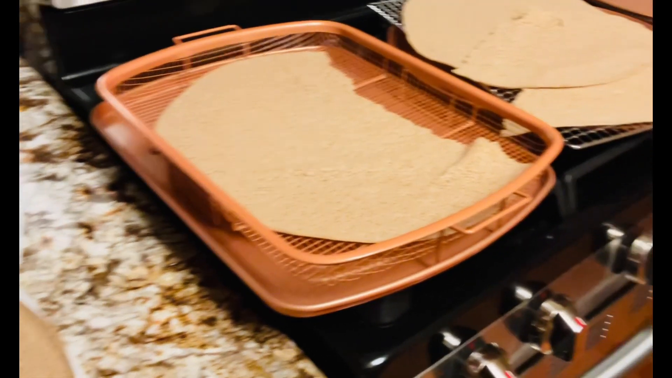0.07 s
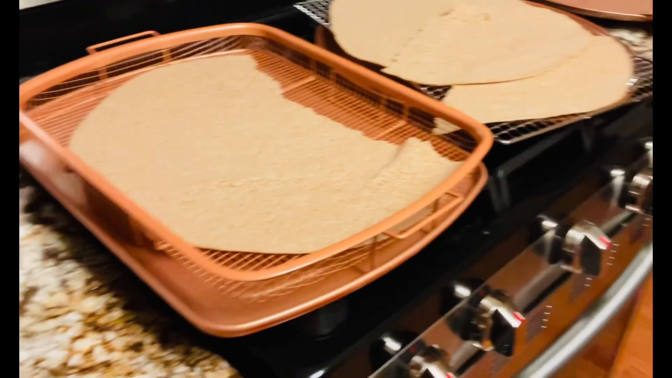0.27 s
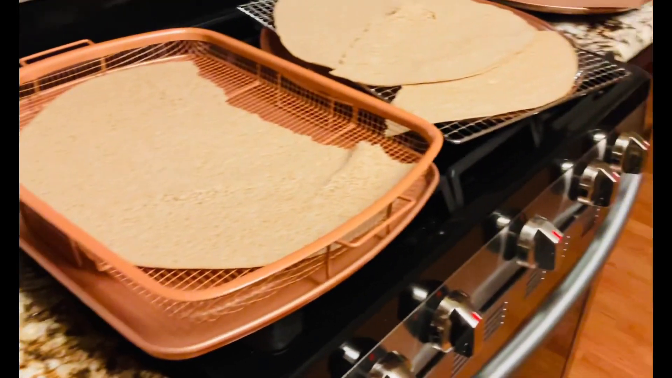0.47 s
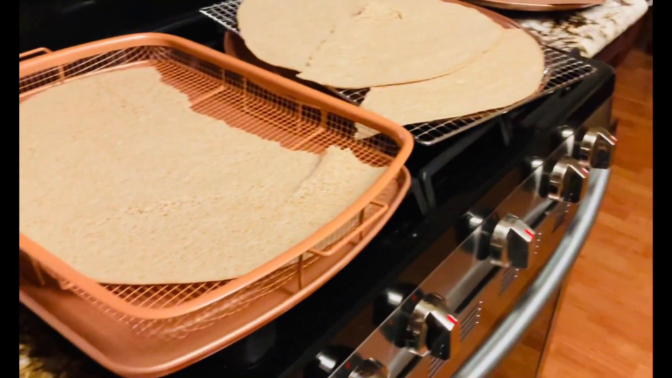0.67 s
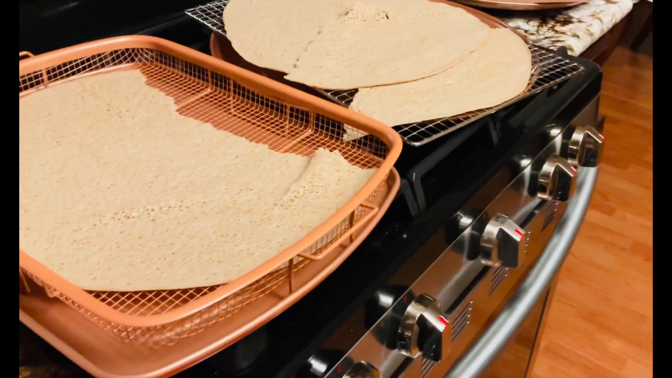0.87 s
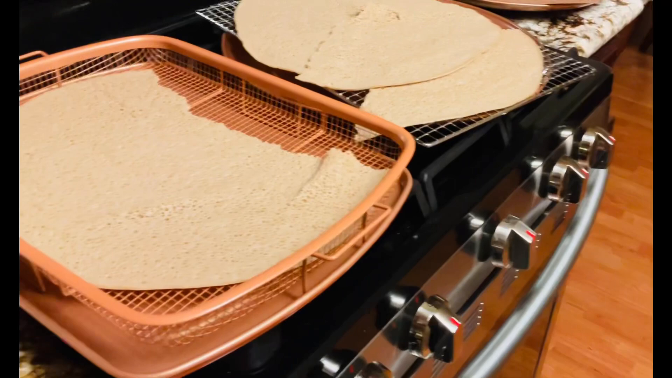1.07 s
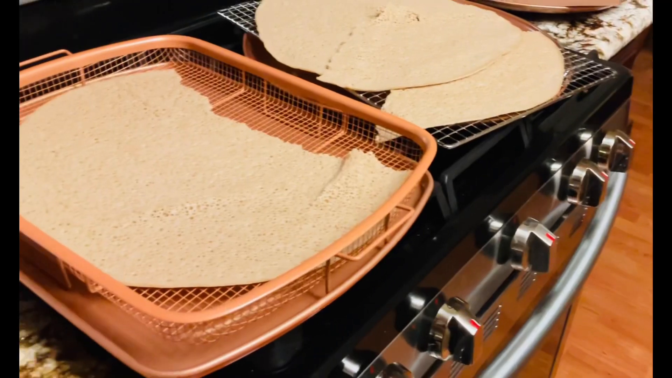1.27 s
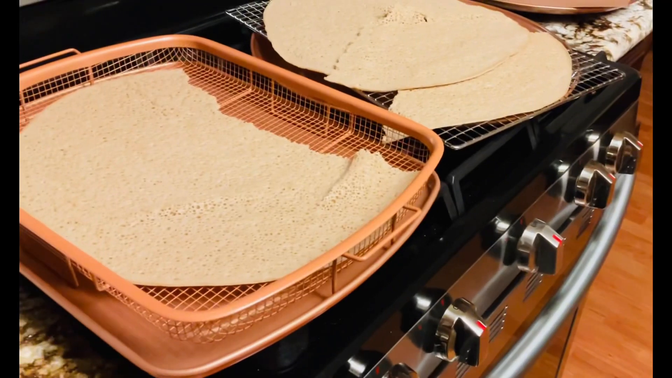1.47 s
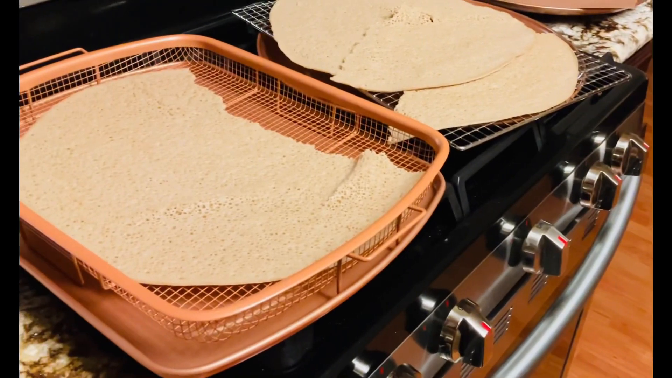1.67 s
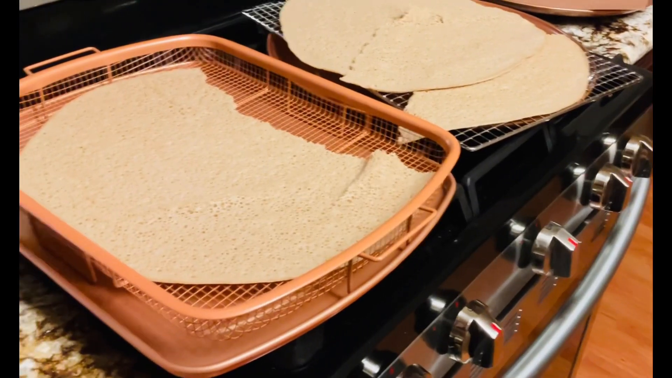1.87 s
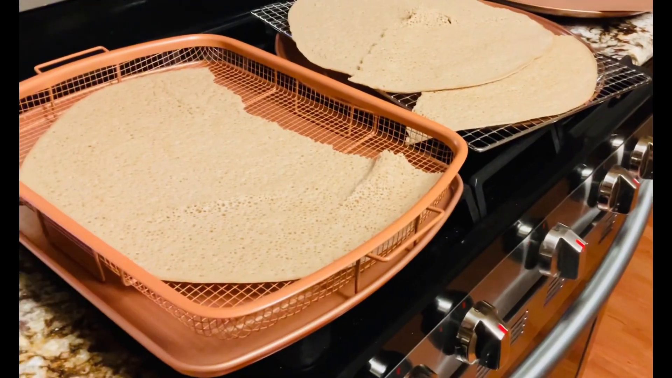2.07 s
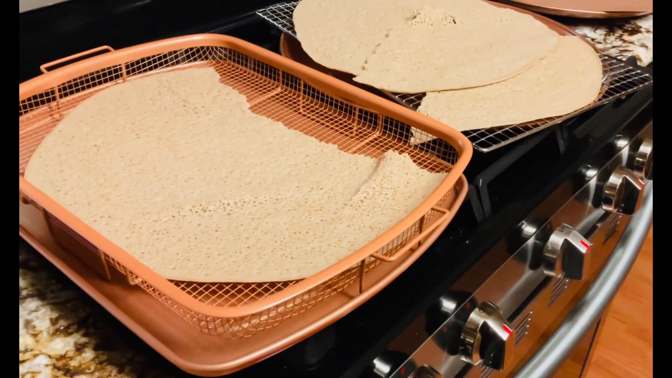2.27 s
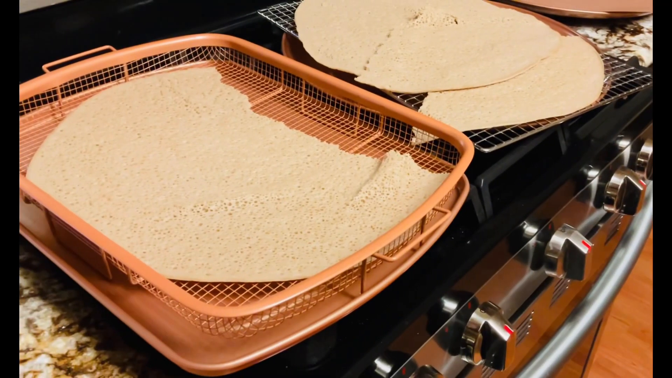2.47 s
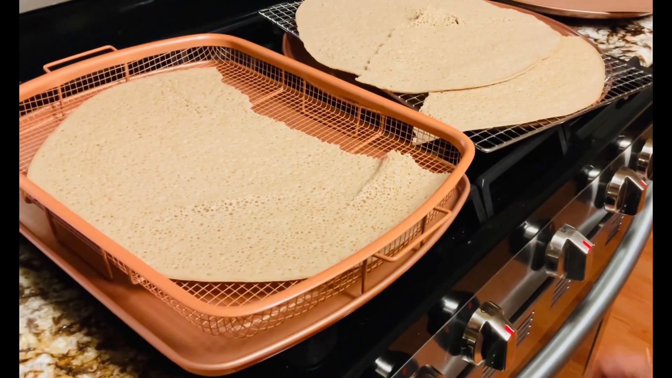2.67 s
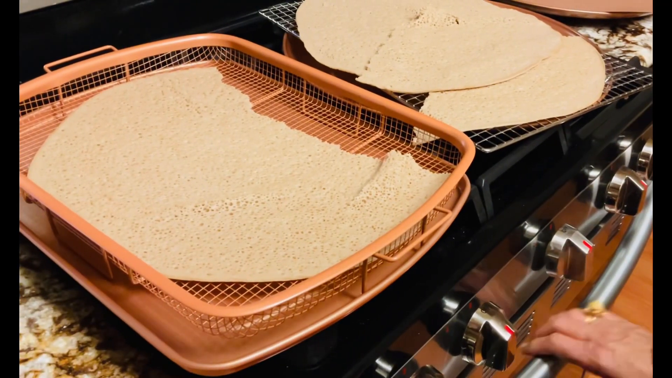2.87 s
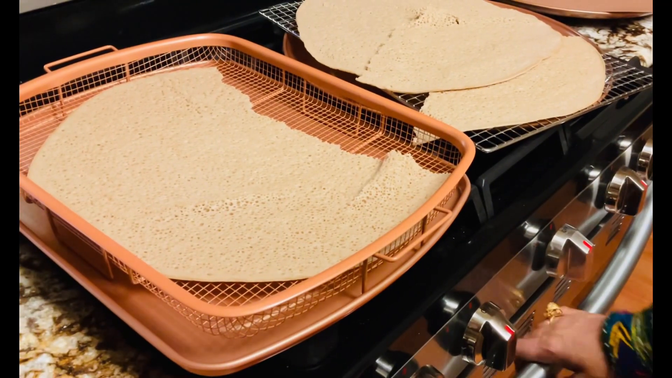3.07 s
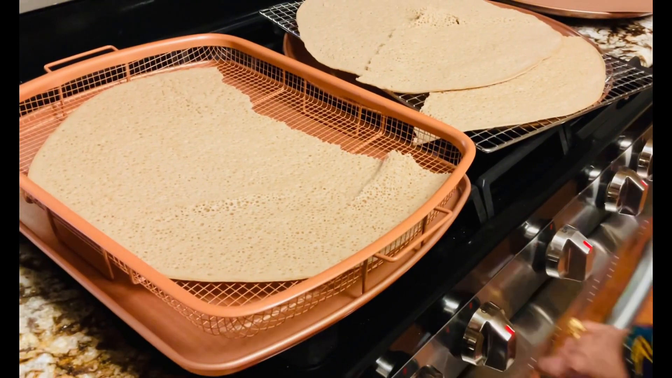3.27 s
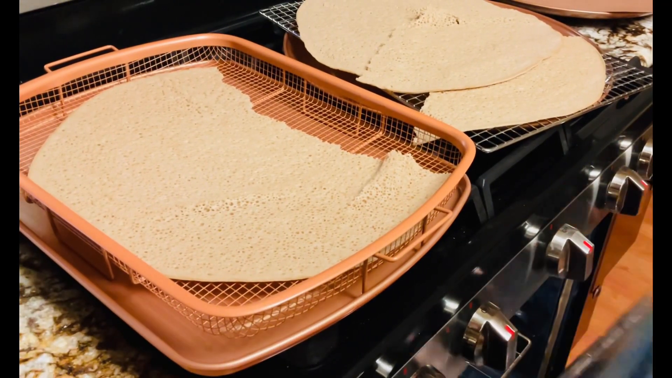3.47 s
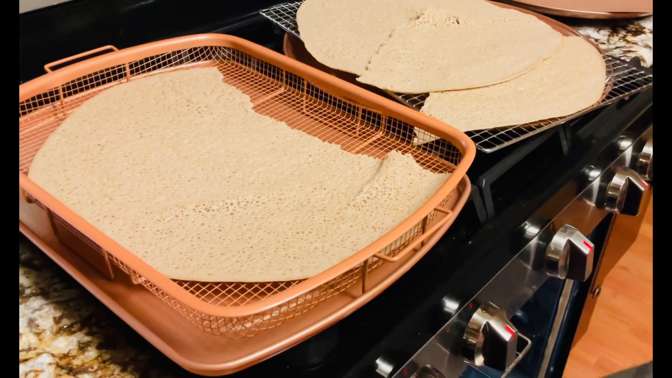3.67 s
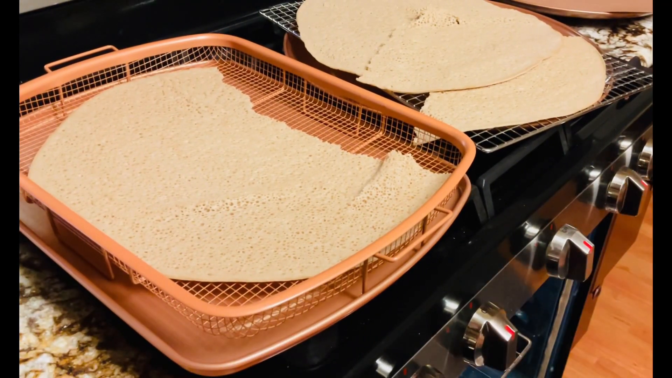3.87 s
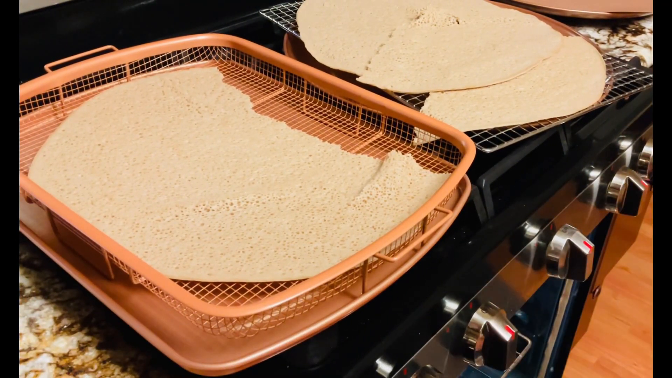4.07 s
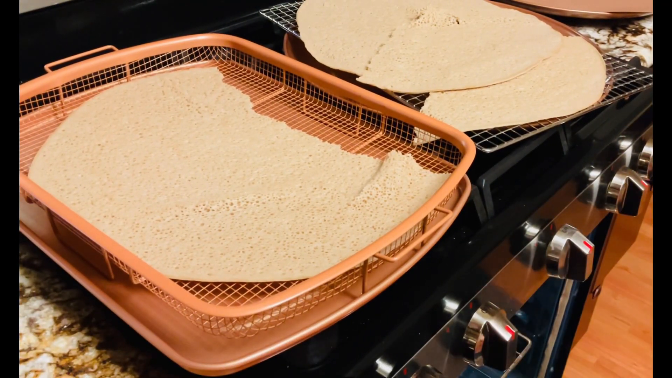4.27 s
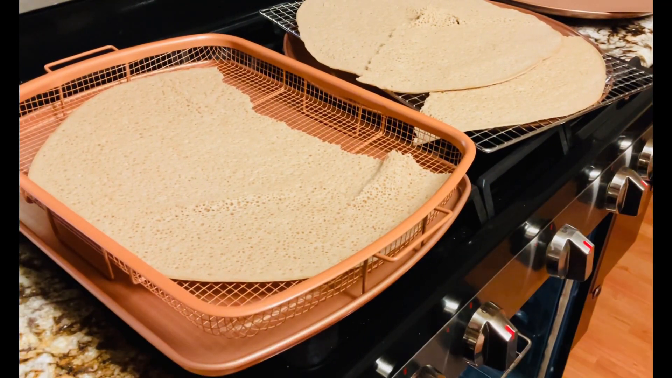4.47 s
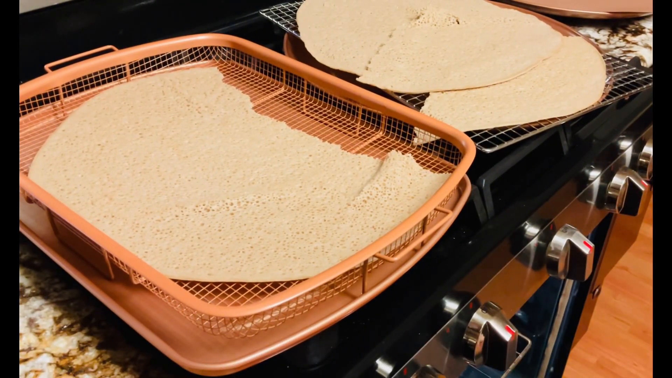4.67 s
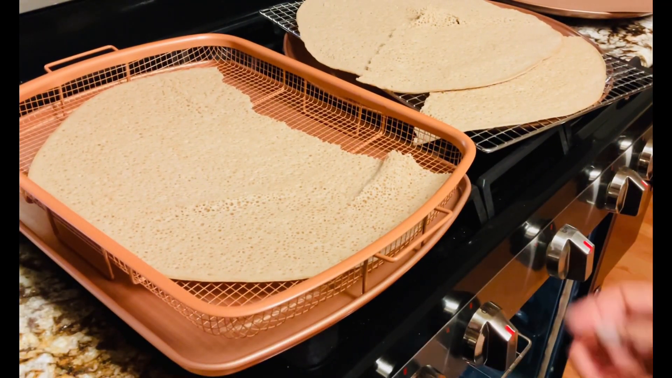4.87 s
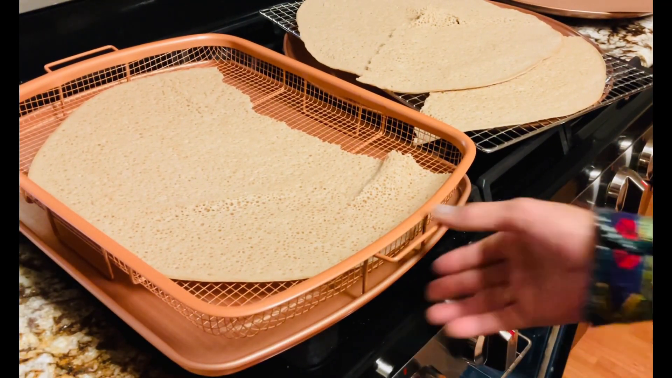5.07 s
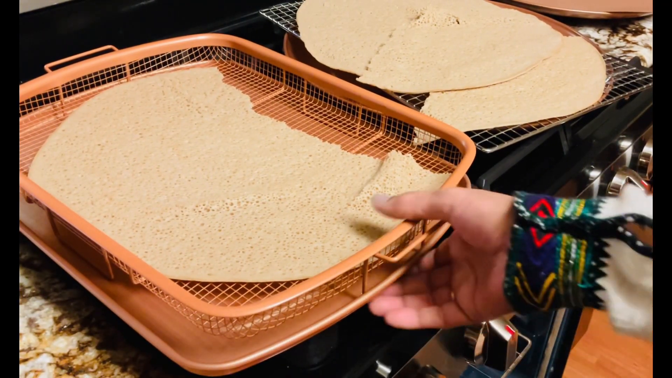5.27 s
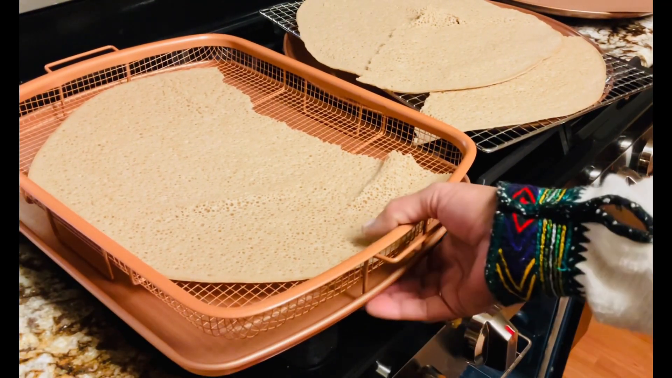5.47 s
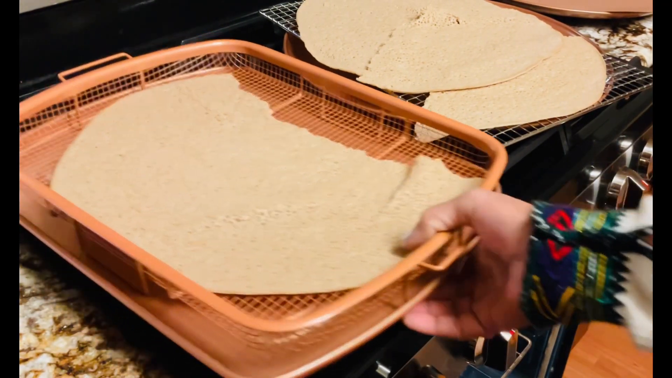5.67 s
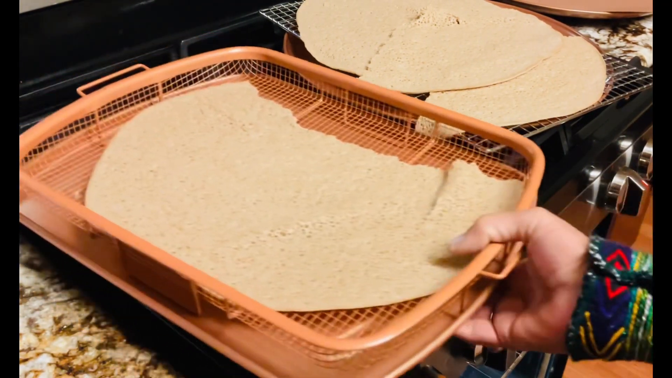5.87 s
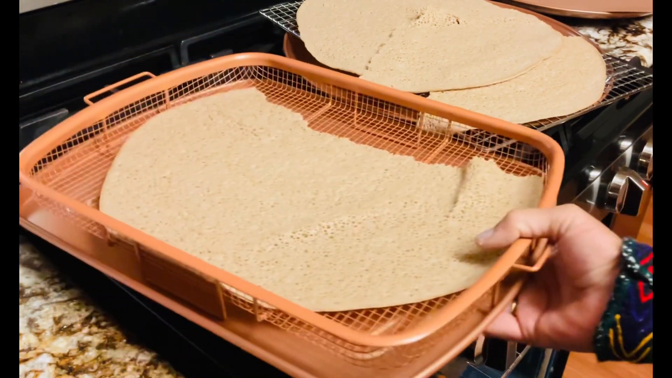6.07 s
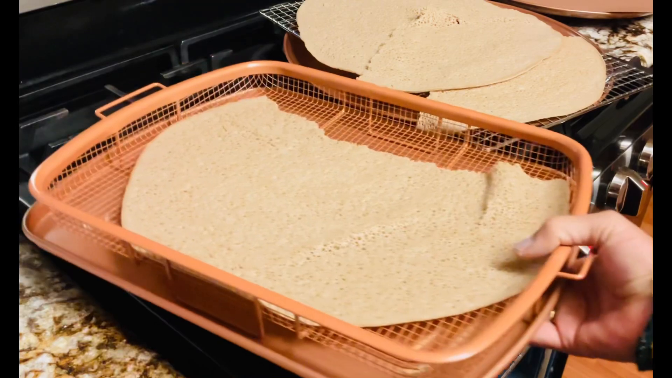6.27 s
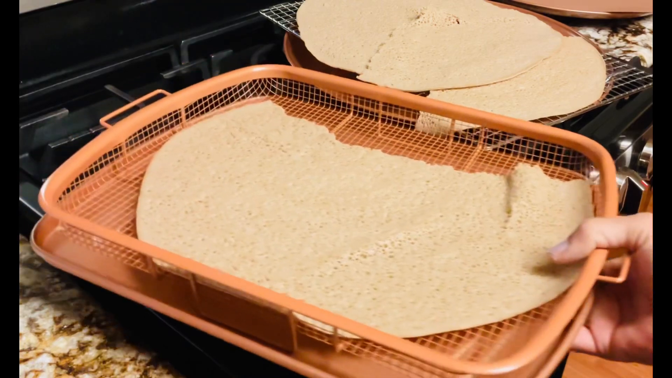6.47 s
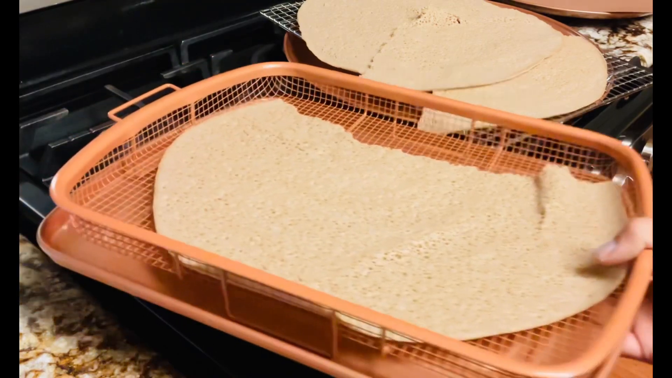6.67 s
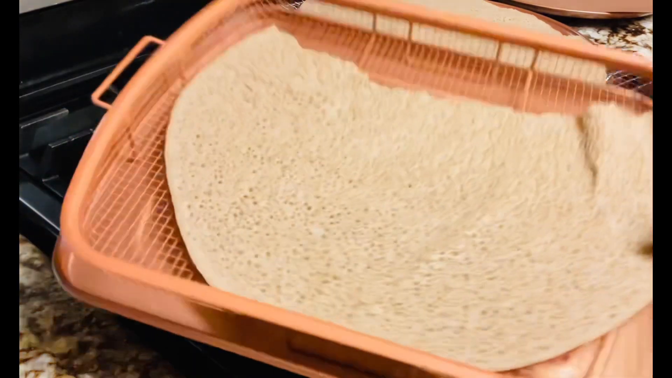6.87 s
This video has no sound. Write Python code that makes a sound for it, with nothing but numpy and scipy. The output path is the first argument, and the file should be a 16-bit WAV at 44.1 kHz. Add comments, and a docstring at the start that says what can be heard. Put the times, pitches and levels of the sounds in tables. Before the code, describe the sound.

A quiet kitchen heard by a close phone microphone, with short reflections from hard walls. From the start, a steady low oven fan hum sits over soft room air and faint fridge drones. At 0.3-0.85 s a mount creaks, its dry ticks slowing to single clicks over a small groan. From 1 to 3 s, cloth swishes softly, with faint steps and tiny hollow blips near 1.6 and 1.95 s. At 3.05-3.5 s the oven door is pulled: crisp clicks, sharp clacks and a woody thump, as the hum stops abruptly. Duller thuds follow at 4.0-4.4 s, then sleeve swishes around 4.7 s and small knocks near 5 s. At 5.4 s a wire basket on a metal tray starts scraping over the stove, chattering and rattling, with thin squeaks around 6.0-6.2 s. It briefly eases, then bumps hard at 6.53 s, bright and clanging, ringing away by 6.9 s.

```python
"""A quiet kitchen: over soft room air an oven fan hums on twice the mains and cloth brushes faintly.
A mount creaks ever slower, as stick-slip ticks; then sleeves and slippers swish as filtered noise.
Steps and the door knock as short notes with noisy cracks, beside a few hollow gliding blips.
The hum stops as the oven door is pulled. Last, a wire basket on a sheet-metal tray is dragged over
the stove, its chatter ringing banks of resonances, and it bumps hard at the end."""
import sys
import numpy as np
from scipy import signal
from scipy.fft import rfft, irfft
from scipy.io import wavfile
from scipy.ndimage import uniform_filter1d

SR = 44100
rng = np.random.default_rng(int(sys.argv[2]) if len(sys.argv) > 2 else 0)


def output_pcm(signal):
    """Save a mono or channel-first signal as 16-bit PCM at the path in sys.argv[1].

    Samples are clipped to [-1, 1] before scaling.
    """
    pcm = np.clip(np.atleast_2d(signal).T, -1, 1) * 32767
    wavfile.write(sys.argv[1], SR, np.round(pcm).astype(np.int16))


def boost(x):
    """Linear amplitude factor 10**(x/20) for a level x in decibels (scalar or array-like)."""
    u = np.asarray(x, float) / 20
    return 10 ** u


N = 305172
T = np.arange(N) / SR

# spectrum of the finest fibres and grit: pitch_hz, density_db (per Hz)
FINE_TONE = [(7000, -32), (10000, 6), (13000, 8.5), (16000, 0.5)]


def unit(x):
    """Scale to rms 1."""
    return x / np.sqrt(np.mean(x ** 2))


def shape(x, points, tilt_db=0.):
    """Filter x by (Hz, dB) points and a tilt in dB per octave about 3 kHz."""
    hz, db = np.transpose(points)
    f = np.maximum(np.fft.rfftfreq(len(x), 1 / SR), 1)
    gain_db = np.interp(np.log(f), np.log(hz), db) + tilt_db * np.log2(f / 3000)
    return irfft(rfft(x) * boost(gain_db), len(x))


def colour(x, points, tilt_db=0.):
    """Shaped x at rms 1."""
    return unit(shape(x, points, tilt_db))


def curve(rows):
    """Columns of a table drawn against time, at -120 outside it."""
    s, *columns = np.transpose(rows)
    return [np.interp(T, s, c, left=-120, right=-120) for c in columns]


def walk(rate):
    """Random levels drawn rate times a second and joined by straight slews; spread near 1."""
    k = int(SR / rate)
    held = np.repeat(rng.standard_normal(N // k + 1), k)
    return uniform_filter1d(held, k)[:N]


def ring(x, hz, t60):
    """One resonance: a unit impulse rings at unit size and falls 60 dB in t60 seconds."""
    r = np.exp(-np.log(1000) / (t60 * SR))
    w = 2 * np.pi * hz / SR
    return signal.lfilter([0, r * np.sin(w)], [1, -2 * r * np.cos(w), r * r], x)


def grains(rate, spread):
    """Random clicks of very unequal size, rate per second."""
    hits = rng.random(N) < rate / SR
    return hits * rng.standard_normal(N) * boost(spread * rng.exponential(size=N))


def fade(t60, rise, size):
    """Envelope of a blow: quick rise, exponential fall."""
    t = np.arange(size) / SR
    return (1 - np.exp(-t / rise)) * np.exp(-np.log(1000) * t / t60)


def add(out, s, x):
    """Mix x in from time s."""
    i = int(s * SR)
    out[i:i + len(x)] += x[:N - i]


def appliances():
    """Fan hum as a sine with overtones, fridge drones as ringing noise, and air as soft broad noise."""
    # oven fan: start_s, level_db
    hum_level = [(0.0, -47), (0.46, -47.5), (0.64, -47.5), (3.07, -48), (3.22, -54), (3.29, -54)]
    # hum overtones: multiple, level_db (against the fundamental)
    overtones = [(2, -25), (3, -25.5)]
    # steady fridge drones: pitch_hz, width_hz (rough), level_db
    drones = [(208.8, 4.7, -71), (55, 24, -69.5), (4400, 41, -83.5), (3840, 210, -80.5), (987, 30, -81.5)]
    # spectrum of the air: pitch_hz, density_db (per Hz)
    air_tone = [(30, -7.5), (50, -9), (100, 0), (160, -5), (300, -10.5), (600, -9.5), (800, -22.5),
                (1100, -15.5), (1600, -22.5), (2500, -27.5), (4500, -36.5), (6000, -43), (16000, -38.5)]
    # loudness of the air: start_s, level_db
    air_level = [(0, -60.5), (1.5, -61), (3.2, -59.5), (3.9, -61), (4.5, -66.5), (5.3, -71), (6.92, -70)]
    hum_hz, hum_waver_db, air_waver_db = 120.2, 1, 1.2

    phase = 2 * np.pi * hum_hz * T
    tone = np.sin(phase) + sum(boost(db) * np.sin(k * phase) for k, db in overtones)
    out = np.sqrt(2) * tone * boost(curve(hum_level)[0] + hum_waver_db * walk(3.6))
    for hz, width, db in drones:
        out += boost(db) * unit(ring(rng.standard_normal(N), hz, 1.8 / width))
    air = colour(rng.standard_normal(N), air_tone)
    return out + boost(curve(air_level)[0] + air_waver_db * walk(6.8)) * air


def blips():
    """Short hollow notes with rounded swells whose pitch glides, each with one echo."""
    # start_s, pitch_hz (at the start), level_db, length_s,
    # glide_per_s (half the rise per second, as a share of the pitch), second_db (2nd harmonic, relative)
    notes = [(1.62, 320, -53.5, 0.027, 2, -20), (1.638, 610, -52, .02, 10, -16),
             (1.929, 307, -53, .03, 2, -20), (1.98, 580, -46, .024, 6, -12),
             (3.983, 331, -43.5, 0.064, -3, -37), (4.263, 314, -53, 0.1, 0, -20)]
    echo_s, echo_db = 0.021, -10

    out = np.zeros(N)
    for s, hz, db, length, glide, second_db in notes:
        t = np.arange(int(length * SR)) / SR
        phase = 2 * np.pi * hz * (t + glide * t ** 2)
        tone = np.sin(phase) + boost(second_db) * np.sin(2 * phase)
        note = boost(db) * tone * np.sin(np.pi * t / length)
        add(out, s, note)
        add(out, s + echo_s, boost(echo_db) * note)
    return out


def creak():
    """Stick-slip in the mount: ever slower ticks over a low groan, then lone ticks."""
    # run of slips: start_s, slips_per_s (before jitter), level_db
    slip_run = [(.26, 260, -80), (.3, 233, -60.5), (.42, 212, -57), (.52, 114, -54), (.6, 67, -51.5),
                (.61, 60, -85)]
    # last single slips: start_s, level_db
    lone_slips = [(0.6556, -55.5), (0.691, -50.5), (0.7872, -54.5), (0.817, -51.5), (0.8344, -53.5),
                  (0.8494, -57)]
    # spectrum of a tick: pitch_hz, density_db (per Hz)
    tick_tone = [(900, -5.5), (1800, -4.5), (3300, -7), (4600, -1.5), (5700, -5), (7500, -15),
                 (9000, -19.5), (16000, -24)]
    groan_hz, groan_db = 328, -5.5  # level against the slips

    rate, db = curve(slip_run)
    turns = np.cumsum(np.maximum(rate, 0) * (1 + .15 * walk(90))) / SR
    # one slip each time the count passes a whole number
    slips = np.diff(np.floor(turns), prepend=0) * boost(db + 0.9 * walk(120))
    for s, slip_db in lone_slips:
        slips[int(s * SR)] += boost(slip_db)
    puffs = signal.fftconvolve(slips, fade(0.019, 0.00015, size=2048))[:N]
    ticks = puffs * colour(rng.standard_normal(N), tick_tone)
    # the groan sinks away as the slips slow down
    groan_level = boost(db + groan_db) * np.clip(rate / 200, 0, 1) ** 2
    groan = groan_level * unit(ring(rng.standard_normal(N), groan_hz, 0.039))
    return ticks + groan


def swish():
    """Fibres of sleeves and slippers rubbing: a soft hiss, and a separate whisper at the very top."""
    # one list per run of strokes: start_s, level_db, top_db (whisper against the hiss)
    strokes = [
        [(0.0, -65.5, -7), (0.02, -80, -5), (0.066, -75, -14), (0.074, -79.5, -1), (0.246, -77, -14),
         (0.282, -67.5, -23), (0.3, -67, -18)],
        [(1.0, -67, -18), (1.022, -74, -10), (1.054, -66.5, -20), (1.072, -67, -27), (1.102, -62, -16),
         (1.232, -53.5, -14), (1.37, -86, -20), (1.382, -86, -7), (1.4, -76, -25)],
        [(1.42, -92, -4), (1.432, -70, -21), (1.596, -92, -11), (1.606, -69, -1), (1.636, -75, -9),
         (1.644, -64, -15), (1.712, -77, -17), (1.75, -76, -21)],
        [(1.93, -89, -15), (1.952, -70.5, -28), (2.042, -74.5, -11), (2.064, -89, -15), (2.07, -93, -18),
         (2.1, -94, -15)],
        [(2.13, -79, -12), (2.186, -81, 10), (2.198, -73, -2), (2.314, -72, -8), (2.334, -62.5, -17),
         (2.422, -54, -15), (2.51, -72.5, -11), (2.672, -89, 5), (2.706, -70, -18), (2.738, -70, -5),
         (2.746, -58.5, -8.5), (2.866, -59, -5), (2.956, -71.5, -3), (3.052, -52.5, -15), (3.062, -51, -4),
         (3.12, -69, -15)],
        [(3.4, -48, -12), (3.422, -62, -10), (3.448, -61, -17), (3.454, -48.5, -22), (3.514, -72.5, 2),
         (3.62, -65, 3), (3.718, -73, -2), (3.742, -80, 5), (3.788, -86, -20), (3.9, -97, -3)],
        [(3.95, -92, -11), (3.974, -94, -5), (3.986, -57, -15), (4.072, -101, -13), (4.146, -83, -11),
         (4.228, -96, -5), (4.26, -82, -23), (4.338, -76, -14), (4.388, -84, 8), (4.394, -70, -9),
         (4.5, -91, -3)],
        [(4.52, -89, -8), (4.604, -64, -25), (4.7, -52, -12), (4.808, -52, -14.5), (4.906, -75, -0.5),
         (5.012, -71.5, 3.5), (5.05, -90, 15), (5.166, -80.5, 4), (5.188, -64.5, -3), (5.296, -85, -1),
         (5.318, -89, 4), (5.332, -63, -2), (5.372, -67.5, -1), (5.414, -59, -5), (5.42, -42, -5)],
    ]
    # spectrum of the hiss: pitch_hz, density_db (per Hz)
    hiss_tone = [(350, -23), (600, -8.5), (643, -14), (1010, -13.5), (1350, -12.5), (2370, -7),
                 (2960, -9.5), (3860, -7), (9500, -23), (12400, -47.5), (20900, -120)]

    hiss = colour(rng.standard_normal(N), hiss_tone) * boost(1.3 * walk(30))
    whisper = colour(rng.standard_normal(N), FINE_TONE)
    out = 0
    for rows in strokes:
        db, top_db = curve(rows)
        out = out + boost(db) * (hiss + boost(top_db) * whisper)
    return out


def knocks():
    """Steps, door and handle: a note of the struck body, its duller shaking, and a dry crack."""
    # start_s, thud_db (shared by note and shaking), thud_hz, shake_t60_s, crack_db, crack_tilt_db (per octave)
    blows = [(1.602, -64, 4000, 0.078, -68, -2), (1.641, -56, 890, 0.12, -63, 1),
             (1.95, -66, 900, 0.11, -68, -5), (2.33, -57, 1900, 0.12, -74, 0),
             (2.747, -51.5, 1910, 0.18, -58, -11), (3.062, -45, 600, .14, -45.5, -3),
             (3.132, -45, 1365, 0.19, -34, 10), (3.152, -43.5, 720, 0.17, -35.5, 10),
             (3.251, -46.5, 310, 0.33, -51.5, -7), (3.314, -30, 2670, 0.063, -26, 3),
             (3.335, -32, 420, 0.15, -33.5, 3), (3.371, -47, 95, .5, -60, -18),
             (3.399, -39, 220, 0.31, -52, -6.5), (3.456, -26, 349, 0.1, -35, -7.5),
             (3.47, -46.5, 493, 0.41, -67, -10), (3.985, -39.5, 300, 0.089, -59, 10),
             (4.02, -54.5, 653, .2, -72, -5), (4.024, -41.5, 170, 0.12, -80, -28),
             (4.09, -48.5, 79.5, 0.19, -83, -11), (4.15, -46, 128, 0.14, -68, -5),
             (4.256, -53.5, 420, 0.34, -66, -4), (4.395, -70, 171, 0.07, -67, -3),
             (4.95, -46, 456, 0.14, -56, 33), (4.995, -44.5, 457, 0.064, -60.5, 7),
             (5.181, -59, 210, 0.3, -66.5, 50), (5.334, -55.5, 402, 0.9, -74, 5)]
    # spectrum of a crack before its tilt: pitch_hz, density_db (per Hz)
    crack_tone = [(400, -45.5), (1000, 3.5), (2000, -2.5), (3200, -5), (4500, -0.5), (7000, -9),
                  (10000, -13), (16000, -16)]
    crack_t60_s, size = 0.071, 16384

    out, t = np.zeros(N), np.arange(size) / SR
    noises = rng.standard_normal((len(blows), 2, size))
    for (s, db, hz, t60, crack_db, tilt_db), noise in zip(blows, noises):
        shake_tone = [(hz / 8, -34), (hz / 3, -15), (hz / 2.04, -3), (hz, 0), (hz * 1.12, -3),
                      (hz * 3, -14), (20000, -60)]
        shake = colour(noise[0], shake_tone) * fade(t60, 0.005, size)
        # the clear note dies sooner than the shaking
        note = np.sin(2 * np.pi * hz * t) * fade(t60 * 0.26, 0.00036, size)
        crack = colour(noise[1], crack_tone, tilt_db) * fade(crack_t60_s, 0.00033, size)
        add(out, s, boost(db) * (1.56 * note + 0.95 * shake))
        add(out, s, boost(crack_db) * crack)
    return out


def squeaks():
    """Thin metal squeaking: friction noise drives one resonance for a moment."""
    # start_s, length_s, pitch_hz, width_hz (rough), level_db
    rubs = [(5.96, .1, 1230, 80, -45), (5.99, .14, 1400, 150, -48), (5.97, .12, 1000, 60, -49),
            (6.15, .075, 1860, 45, -45), (6.16, .07, 980, 50, -50), (6.16, .095, 3900, 140, -51),
            (6.488, .045, 4100, 60, -50), (3.15, .035, 3700, 200, -57), (5.18, .14, 1640, 30, -67),
            (5.18, .1, 1170, 60, -70), (3.61, .09, 8700, 40, -72), (3.315, .045, 3450, 80, -45),
            (2.748, .07, 1950, 90, -66), (3.398, .016, 2450, 120, -50)]

    out = np.zeros(N)
    for (s, length, hz, width, db), noise in zip(rubs, rng.standard_normal((len(rubs), 16384))):
        # the end of the run, where the resonance has built up
        rub = unit(ring(noise, hz, 2.9 / width))[-int(length * SR):]
        add(out, s, boost(db) * rub * signal.windows.tukey(len(rub), .5))
    return out


def metal(push, modes, free_db, free_tilt_db):
    """Ring a set of modes: damped while pressed on the stove, longer and rebalanced once lifted off."""
    grab_s, lift_s = 5.3, 6.528
    held_down = .35  # share of the free ring time left while sliding
    contact_shift_db = 5

    out, start = np.zeros(N), int(grab_s * SR)
    free = T[start:] > lift_s
    for hz, db, t60 in modes:
        # the point of contact wanders, so each mode is driven now hard, now barely
        force = boost(db) * (push * boost(contact_shift_db * walk(14)))[start:]
        held_ring = ring(force * ~free, hz, held_down * t60)
        free_gain = boost(free_db + free_tilt_db * np.log2(hz / 1000))
        out[start:] += held_ring + ring(force * free, hz, t60) * free_gain
    return out


def basket():
    """Dense chattering contacts and bumps ring the tray and the wires and rasp along them."""
    # strokes of the drag: start_s, tray_db (pressure), then against it: wire_db (rattle), fine_db (rasp),
    # stove_db (stove-top rumble)
    drag = [
        [(5.39, -48, -11, -16, -4), (5.394, -55.5, -9, -13, 4), (5.42, -45, -5, -11, -11)],
        [(5.422, -39, -9, -16, -12), (5.434, -28.5, -12.5, -23, -16), (5.502, -36.5, -5, -8.5, -16),
         (5.692, -34.5, -0.5, -16, -14), (5.7, -26.5, -9, -30, -17), (5.742, -43.5, 1, -1.5, 0),
         (5.838, -44.5, -5, -11, -9), (5.874, -44.5, -1, 0, -16), (5.928, -44, -6, -16, -10.5),
         (6.034, -40.5, -7, -12.5, -29), (6.114, -42, -6.5, -18, -11.5), (6.234, -53, 5.5, 1.5, -21),
         (6.245, -45, -1, -15, -20)],
        [(6.251, -35, -15, -35, -22), (6.289, -36, -27, -27, -12.5), (6.305, -42, -13.5, -37, -15),
         (6.423, -57.5, -17, -20, -2), (6.481, -52.5, -12, -23, -13), (6.493, -52.5, -0.5, -11, -16),
         (6.521, -41, -2.5, -25, -18)],
        [(6.53, -33.5, 6, 9, -24), (6.552, -18.5, -9.5, -15, -31), (6.564, -21, -9.5, -17, -26),
         (6.606, -28.5, -3.5, -14.5, -15), (6.63, -28, -11.5, -27, -21), (6.64, -33, -4.5, -3.5, -14),
         (6.748, -54.5, -7, -29, -6.5), (6.92, -67.5, -2, -6, -5)],
    ]
    # bumps: start_s, tick_db, tray_db (against the tick), tick_hz (centre), top_db (14 kHz against the centre)
    bumps = [(5.4228, -32, -1, 1500, -28), (5.638, -24.5, -14, 4500, -17), (5.699, -25.5, -0.5, 1250, -26),
             (5.786, -31.5, -7, 2200, -28), (5.8736, -23, -20, 4300, -11.5), (6.2506, -30, -4, 1260, -51),
             (6.529, -9, -19.5, 6600, -0.5), (6.545, -32.5, -6, 1100, -12), (6.593, -24, 8, 2780, -15),
             (6.635, -26, -6, 6840, -6)]
    # free modes of the sheet-metal tray: pitch_hz, drive_db, free_t60_s
    tray_modes = [(420, -8, 0.12), (469.7, -3.5, 0.12), (514, -2.5, 0.23), (553, -3.5, 0.27),
                  (600, -1.5, 0.14), (668, -7, .15), (760, -10, .2), (849, -11, 0.16), (967.4, -10.5, 0.59),
                  (997, -5, 0.2), (1122, -10.5, .4), (1222, -2.5, 0.17), (1250, -20, .15),
                  (1339, -1.5, 0.14), (1430, -8.5, 0.32)]
    # free modes of the basket wires: pitch_hz, drive_db, free_t60_s
    wire_modes = [(1614, -4, .15), (1754, 3, .14), (1870, -15, .12), (2070, -5.5, .3), (2336, -6, 0.26),
                  (2655, -8, .3), (2810, -3.5, 0.28), (2960, -9.5, .3), (3490, -5.5, .3), (4000, -4.5, .3),
                  (4536, -5, .25), (5320, -6, 0.21), (5560, -12, 0.33), (6390, -6.5, .15), (6850, -8, .2),
                  (7900, -7.5, .2), (8260, -8, .2)]
    # spectra of the tray's body, the grit and the stove top: pitch_hz, density_db (per Hz)
    body_tone = [(150, -55), (300, -22), (500, 6), (800, -8.5), (1200, -9), (2000, -10.5), (4000, -44)]
    grit_tone = [(700, -12.5), (1800, -0.5), (4500, 1.5), (6500, -7), (9000, -6.5), (12000, -24)]
    stove_tone = [(40, -19), (90, -2), (150, 0.5), (230, -3.5), (330, -24.5)]

    tray_db, wire_db, fine_db, stove_db = np.max([curve(rows) for rows in drag], axis=0)
    chatter = [unit(grains(9000, 1.5) * boost(2 * walk(60))) for _ in range(3)]
    tray_push = chatter[0] * boost(tray_db)
    wire_push = chatter[1] * boost(tray_db + wire_db)
    out = colour(chatter[2], FINE_TONE) * boost(tray_db + fine_db)
    rumble = colour(rng.standard_normal(N), stove_tone) * boost(tray_db + stove_db)

    noises = rng.standard_normal((len(bumps), 2, 4096))
    for (s, db, tray_rel_db, hz, top_db), noise in zip(bumps, noises):
        add(tray_push, s, boost(db + tray_rel_db) * noise[0] * fade(0.026, 0.00026, size=4096))
        tick_tone = [(hz / 6, -36), (hz / 1.8, -6), (hz, 0), (hz * 1.53, -5), (14000, top_db)]
        tick = boost(db) * colour(noise[1], tick_tone) * fade(0.039, 0.00055, size=4096)
        add(out, s, tick)
        add(wire_push, s, 0.15 * tick)

    tray = metal(tray_push, tray_modes, free_db=-1.5, free_tilt_db=6)
    wires = metal(wire_push, wire_modes, free_db=-7, free_tilt_db=-1.5)
    out += boost(-35.5) * tray + boost(12) * shape(tray_push, body_tone)
    out += boost(-35) * wires + boost(5) * shape(wire_push, grit_tone)
    # a thin tray radiates little bass
    thin = signal.butter(4, 360, "high", fs=SR, output="sos")
    return rumble + signal.sosfilt(thin, out)


def room(x):
    """Hard kitchen walls: a dense tail that dies sooner in the treble."""
    # reverberation: pitch_hz, t60_s
    decay = [(200, 0.52), (1000, 0.38), (5000, 0.31), (14000, 0.17)]
    tail_db = -7  # tail energy against the direct sound

    decay_hz, decay_s = np.transpose(decay)
    tail = 0
    for hz in 125 * 2. ** np.arange(8):
        t60 = np.interp(np.log(hz), np.log(decay_hz), decay_s)
        band = [(hz / 2, -40), (hz / 1.4, -3), (hz * 1.4, -3), (hz * 2, -40)]
        octave = colour(rng.standard_normal(SR), band)
        tail = tail + np.sqrt(hz) * octave * fade(t60, 0.0027, size=SR)
    tail = tail / np.sqrt(np.sum(tail ** 2))
    return x + boost(tail_db) * signal.fftconvolve(x, tail)[:N]


def scene():
    """Everything handled sounds in the room, over close blips and the appliances."""
    handled = creak() + swish() + knocks() + squeaks() + basket()
    return (room(handled) + blips() + appliances())[None]


def top_cut(x):
    """Nothing passes above the cut-off."""
    return signal.sosfilt(signal.butter(12, 16810, fs=SR, output="sos"), x)


def record(dry):
    """The phone's microphone cuts the deepest bass, dips near 10 kHz and recovers towards 15 kHz."""
    # microphone response: pitch_hz, gain_db
    response = [(20, -59), (40, -25.5), (50, 3), (60, 1), (7500, -2.5), (9000, -6), (10300, -9),
                (12500, -2.5), (15500, -0.5), (22050, -34.5)]
    mix = shape(dry[0], response)[None]
    return top_cut(mix)


dry = scene()
out = record(dry)
output_pcm(out)
```